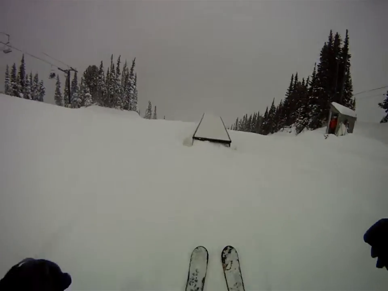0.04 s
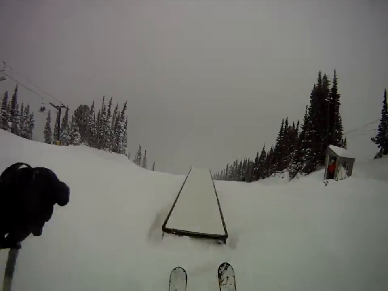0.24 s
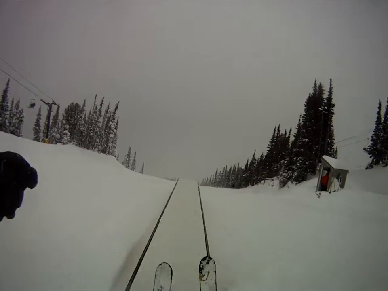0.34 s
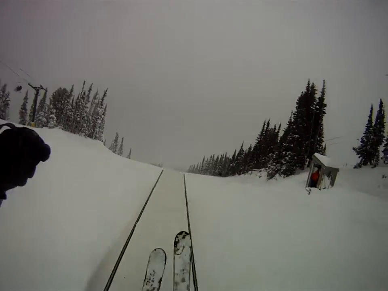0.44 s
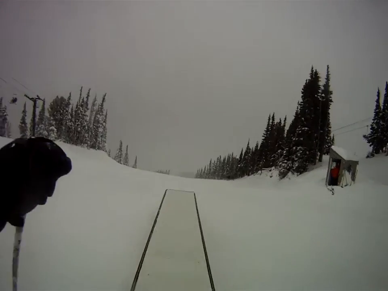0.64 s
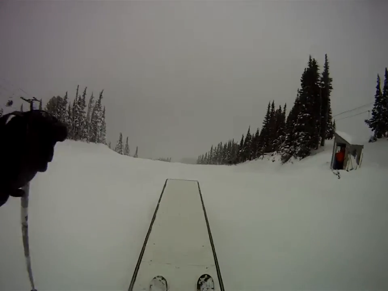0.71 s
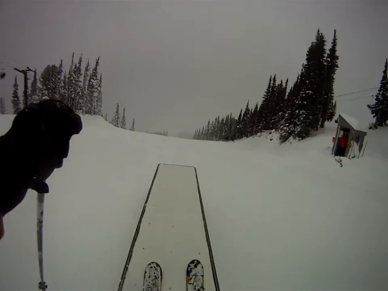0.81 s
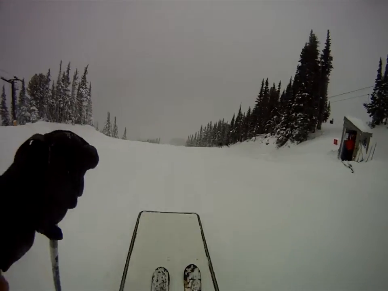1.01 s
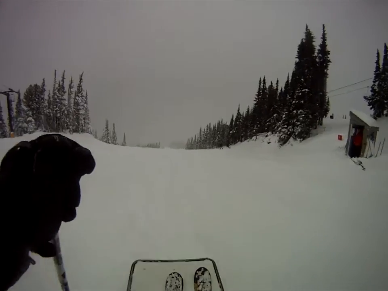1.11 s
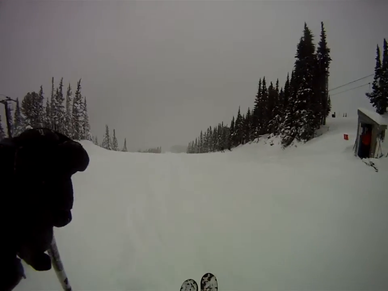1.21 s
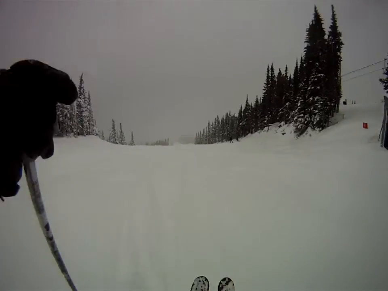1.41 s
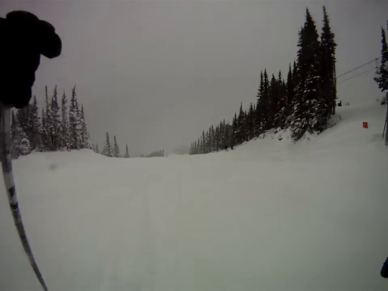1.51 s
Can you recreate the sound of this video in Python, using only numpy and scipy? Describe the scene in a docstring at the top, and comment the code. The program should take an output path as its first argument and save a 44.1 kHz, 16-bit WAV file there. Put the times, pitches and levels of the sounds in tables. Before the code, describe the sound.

Heard close through a body-worn microphone on a snowy slope, skis crunch and knock, land on a box with a loud clatter and thump, then glide faintly before hissing on snow again. Gusts buffet the microphone around the landing.

```python
"""Terrain park: a skier glides over soft snow, slaps onto a box, slides along it, drops back into snow.
Ski friction hisses and crunches; skis and bindings knock and rattle. Both ring the plastic case
around a body-worn microphone. A loose buckle ticks and a tapped ski clacks. On landing the skis
flex and the box booms. Wind rumbles on the case."""
import sys
import numpy as np
from scipy import signal
from scipy.fft import rfft, irfft, next_fast_len
from scipy.io import wavfile
from scipy.ndimage import uniform_filter1d

SR = 44100
rng = np.random.default_rng(int(sys.argv[2]) if len(sys.argv) > 2 else 0)


def bounce(signal):
    """Save signal as a 16-bit WAV file at the path given by the first command-line argument."""
    frames = np.transpose(np.atleast_2d(signal))
    limited = np.clip(frames, -1, 1)
    pcm = np.round(limited * 32767).astype(np.int16)
    wavfile.write(sys.argv[1], SR, pcm)


N = 68355
T_S = np.arange(N) / SR
NFFT = 2 * next_fast_len(N)
F_HZ = np.maximum(np.arange(NFFT // 2 + 1) * SR / NFFT, 1)
TREBLE_HZ = 3260  # body/treble split

# wind and body shake on the case: t/s, level/dB
WIND_LEVEL = [(0, -48), (.13, -44.5), (.26, -32.5), (.36, -43), (.45, -39), (.51, -32.5), (.59, -27.5),
              (.645, -42), (.71, -25.5), (.79, -46), (.87, -49.5), (.92, -46), (1.0, -55), (1.33, -51.5),
              (1.43, -43.5), (1.55, -43)]
# wind rumble: f/Hz, level/dB
RUMBLE_SPECTRUM = [(20, -10), (45, -15.5), (70, -26), (120, -19.5), (300, -68)]
# wind buffeting: f/Hz, level/dB
BUFFET_SPECTRUM = [(35, -25), (70, -5.5), (115, -1), (180, -7), (300, -14), (450, -33), (800, -19.5),
                   (3000, -64.5)]
# case resonances: f/Hz, half width/Hz, level/dB
CASE_PEAKS = [(913, 394, -7.5), (1244, 108, 4), (1635, 102, 2), (1979, 167, 5), (2271, 63, -0.5),
              (2796, 363, -2.5), (3350, 526, -10), (5120, 533, -9.5), (6826, 450, -11.5),
              (9320, 890, -10.5), (10040, 123, -6.5), (14270, 710, -11.5)]
# case dips and one small lift: f/Hz, half width/Hz, gain/dB
CASE_TRIM = [(1375, 45, 2.5), (5950, 595, -12.5), (11950, 400, -19)]
# faint, brief swells of bright hiss: centre t/s, level/dB, length/s
HISS_FLICKS = [(0.393, -50, 0.0088), (0.454, -42, 0.017), (.728, -40, 0.0076), (1.383, -54, 0.06)]
# ski bases on the smooth box top: centre t/s, level/dB, length/s
BOX_SLIDE = [(0.98, -58, 0.49)]
# taps on a ski: t/s, level/dB
CLACKS = [(1.0995, -32)]
# hollow ski modes: f/Hz, level/dB, t60/s
CLACK_MODES = [(790, 1, 0.022), (1780, -3, .014), (3190, 3, 0.011)]
# buckle ticks: t/s, level/dB
TICKS = [(0.2276, -11), (0.492, -10.5), (0.525, -11), (0.5509, -12), (0.5996, -9), (0.8126, -9.5),
         (0.8246, -19), (0.9681, -18.5)]
# buckle modes: f/Hz, level/dB, t60/s
TICK_MODES = [(2180, -5, 0.0031), (9850, -17.5, 0.0031), (14200, -19.5, .0024)]
# skis slap flat on the box: t/s, level/dB, contact/s
SLAPS = [(.499, -26.5, 0.0017), (.526, -20.5, 0.0035), (.586, -31.5, 0.0014), (.643, -23.5, 0.0018),
         (.683, -25, 0.0027)]
# ski flex modes: f/Hz, level/dB, t60/s
FLEX_MODES = [(168, -13, 0.104), (280, 0, 0.11), (379.5, 4, 0.06)]
# skier's weight comes down: t/s, level/dB, contact/s
THUMPS = [(.561, -21, .008), (.572, -19.5, 0.0061), (.583, -19.5, 0.0074), (.68, -22, 0.0086),
          (.71, -18, 0.0105), (.755, -31, 0.0082)]
# low box modes: f/Hz, level/dB, t60/s
BOX_MODES = [(82.4, 2, 0.064), (115, 2, 0.12)]
# ski friction: t/s, level/dB
GLIDE_LEVEL = [(0, -50), (.09, -47.5), (.15, -37), (.2, -45), (.245, -34.5), (.28, -49), (.34, -39),
               (.38, -45.5), (.49, -42), (.51, -30), (.56, -37.5), (.61, -30.5), (.635, -43.5), (.7, -33.5),
               (.74, -42.5), (.83, -42.5), (.88, -47), (1.08, -49), (1.19, -41.5), (1.34, -47),
               (1.395, -41.5), (1.425, -51), (1.55, -41.5)]
# friction brightness: t/s, treble gain/dB
GLIDE_TREBLE = [(.4, -4), (.75, -1), (1.05, 1), (1.2, -1), (1.33, -1.5), (1.39, -1), (1.44, -4),
                (1.51, -2.5)]
# ski and binding knocks: t/s, level/dB, contact/s, treble re body/dB
KNOCKS = [(0.164, -29, 0.0014, -9.5), (0.2054, -30.5, 0.0012, -10), (0.214, -37, 0.00051, -7),
          (0.256, -18.5, 0.00062, -3), (0.2641, -23, 0.0011, -9), (0.4985, -16.5, 0.0069, -7.5),
          (0.5246, -18.5, 0.0028, -5.5), (0.5496, -20.5, 0.0016, -1.5), (0.585, -22, 0.0054, -7.5),
          (0.602, -38, .001, -8), (0.6397, -11, 0.0047, -5), (0.6472, -6, 0.0039, -7.5),
          (0.683, -18.5, 0.00056, -9.5), (.694, -17.5, 0.006, -7.5), (0.763, -34, 0.0034, -14),
          (0.905, -36.5, 0.0056, -11), (1.0989, -31, 0.0012, -6.5), (1.25, -39.5, 0.0036, -8),
          (1.459, -43, 0.0031, -24)]
# emphasis of hard contacts: f/Hz, gain/dB
KNOCK_SPECTRUM = [(500, -6), (2000, 1.5), (3200, 3), (5200, 7.5), (10000, 2)]


def from_db(db):
    """Decibels to gain."""
    return 10 ** (np.asarray(db) / 20)


def unit_rms(x):
    """Scale to unit power."""
    return x / np.sqrt(np.mean(x ** 2) + 1e-20)


def envelope(rows):
    """Gain over time from (t/s, level/dB) points."""
    return from_db(np.interp(T_S, *np.transpose(rows)))


def spectrum_gain(rows):
    """Gain over frequency from (f/Hz, level/dB) points."""
    f_hz, db = np.transpose(rows)
    return from_db(np.interp(np.log(F_HZ), np.log(f_hz), db))


def butter(x, order, edge_hz, kind):
    """Causal Butterworth filter."""
    return signal.sosfilt(signal.butter(order, edge_hz, kind, fs=SR, output="sos"), x)


def colour(x, gain):
    """Minimum-phase filter; gain scaled to unit power."""
    cepstrum = irfft(np.log(unit_rms(gain) + 1e-7))
    cepstrum[1:NFFT // 2] *= 2
    cepstrum[NFFT // 2 + 1:] = 0
    return irfft(rfft(x, NFFT) * np.exp(rfft(cepstrum)))[:N]


def ring(force, modes):
    """Sum of damped resonators driven by one force."""
    out = np.zeros(N)
    for f_hz, db, t60_s in modes:
        r, w = from_db(-60 / (t60_s * SR)), 2 * np.pi * f_hz / SR
        out += from_db(db) * signal.lfilter([0, np.sin(w)], [1, -2 * r * np.cos(w), r * r], force + 1e-18)
    return out


def case_gain():
    """Plastic case: magnitude of its resonances and dips."""
    power = sum(from_db(db) ** 2 / (1 + ((F_HZ - f_hz) / width_hz) ** 2) ** 2
                for f_hz, width_hz, db in CASE_PEAKS)
    trim_db = sum(db * np.exp(-((F_HZ - f_hz) / width_hz) ** 2) for f_hz, width_hz, db in CASE_TRIM)
    return np.sqrt(power) * from_db(trim_db)


def wind(spectrum, gain_db):
    """Wind on the case: low noise, levelled, then shaped by the gusts."""
    noise = colour(rng.standard_normal(N), spectrum_gain(spectrum))
    local_rms = np.sqrt(uniform_filter1d(noise ** 2, 2000) + 1e-9)
    return from_db(gain_db) * envelope(WIND_LEVEL) * noise / local_rms


def bright_hiss(rows, band_hz):
    """Bright, case-coloured noise; swells and fades once per row."""
    swells = sum(from_db(db) * np.exp(-(2 * (T_S - t_s) / length_s) ** 2) for t_s, db, length_s in rows)
    noise = colour(rng.standard_normal(N), case_gain())
    return swells * unit_rms(butter(noise, 4, band_hz, "band"))


def ski_clack(band_hz=(550, 3800)):
    """A tap rings the hollow ski modes; only the midrange radiates."""
    taps = np.zeros(N)
    for t_s, db in CLACKS:
        taps[int(t_s * SR)] += from_db(db)
    return butter(ring(taps, CLACK_MODES), 2, band_hz, "band")


def buckle_ticks():
    """Loose plastic buckle: three modes swell and die within milliseconds."""
    out = np.zeros(N)
    for f_hz, mode_db, t60_s in TICK_MODES:
        for (t_s, tick_db), detune in zip(TICKS, rng.normal(1, 0.0078, len(TICKS))):
            age_s = np.maximum(T_S - t_s, 0)
            decay = np.log(1000) * age_s / t60_s
            swell = (decay / 2) ** 2 * np.exp(2 - decay)
            out += from_db(mode_db + tick_db) * swell * np.sin(2 * np.pi * f_hz * detune * age_s)
    return out


def landing(pushes, modes):
    """Soft sine-squared pushes ring the low modes of skis or box."""
    force = np.zeros(N)
    for t_s, db, contact_s in pushes:
        pulse = np.sin(np.pi * np.clip((T_S - t_s) / contact_s, 0, 1)) ** 2
        force += from_db(db) * pulse * 2 / (contact_s * SR)
    return ring(force, modes)


def grains(rate_per_s, spread_db=3):
    """Crunching grains: random clicks of uneven size, unit power."""
    sizes = from_db(spread_db * np.minimum(rng.exponential(1, N), 4)) * rng.choice([-1, 1], N)
    return unit_rms(sizes * (rng.random(N) < rate_per_s / SR))


def ski_glide(gain_db=-1.5, grain_db=-4, grit_db=-6.5, grit_hz=(2100, 4000), chatter_db=6, chatter_hz=115):
    """Grainy friction rings the case; pressure adds icy grit and stick-slip chatter."""
    force = unit_rms(rng.standard_normal(N) + from_db(grain_db) * grains(rate_per_s=2500))
    level = from_db(gain_db) * envelope(GLIDE_LEVEL)
    pressure = level / level.max()
    grit = colour(grains(rate_per_s=250), case_gain())
    grit = from_db(grit_db) * level * pressure * unit_rms(butter(grit, 2, grit_hz, "band"))
    flutter = unit_rms(butter(rng.standard_normal(N), 2, chatter_hz, "low"))
    chatter = from_db(chatter_db * np.sqrt(pressure) * np.clip(flutter, -2, 2))
    body = irfft(rfft(force, NFFT) / (1 + (F_HZ / TREBLE_HZ) ** 8))[:N]
    treble = (force - body) * envelope(GLIDE_TREBLE)
    return colour(level * chatter * (body + treble), case_gain()) + grit


def ski_knocks(crack_db=15.5, release_s=0.00069, rattle_db=-14, rattle_t60_s=0.098, ref_contact_s=0.003):
    """Crack, chattering contact and rattle ring the case; longer contacts rattle more."""
    out, age_s = np.zeros(N + SR), T_S[:SR // 10]
    n = len(age_s)
    response = colour(signal.unit_impulse(N), case_gain() * spectrum_gain(KNOCK_SPECTRUM))[:n]
    crack = from_db(crack_db) * butter(signal.unit_impulse(n), 2, edge_hz=1760, kind="high")
    rattle_decay = from_db(rattle_db - 60 * age_s / rattle_t60_s)
    for t_s, db, contact_s, treble_db in KNOCKS:
        contact = np.exp(-np.maximum(age_s - contact_s, 0) / release_s)
        rattle = np.sqrt(contact_s / ref_contact_s) * rattle_decay
        force = crack + rng.choice([-1., 1.], n) * np.maximum(contact, rattle)
        knock = signal.fftconvolve(force, response)[:n]
        start = int(t_s * SR)
        for kind, band_db in (("low", db), ("high", db + treble_db)):
            band = butter(knock, 5, TREBLE_HZ, kind)
            band *= np.sqrt(ref_contact_s * SR / np.sum(band ** 2))  # equal energy
            out[start:start + n] += from_db(band_db) * band
    return out[:N]


def scene():
    """One microphone, same in both channels."""
    skis = ski_glide() + ski_knocks() + ski_clack()
    hiss = bright_hiss(HISS_FLICKS, band_hz=(3800, 8340)) + bright_hiss(BOX_SLIDE, band_hz=(4600, 7300))
    boom = landing(SLAPS, FLEX_MODES) + landing(THUMPS, BOX_MODES)
    air = wind(RUMBLE_SPECTRUM, gain_db=2) + wind(BUFFET_SPECTRUM, gain_db=-2.5)
    return np.tile(air + hiss + buckle_ticks() + boom + skis, (2, 1))


def record(dry):
    """Clip at full scale, then steep low-pass."""
    cutoff_hz = 15700
    lowpass = signal.ellip(12, .2, 95, cutoff_hz, fs=SR, output="sos")
    return signal.sosfilt(lowpass, np.clip(dry, -1, 1))


dry = scene()
out = record(dry)
bounce(out)
```